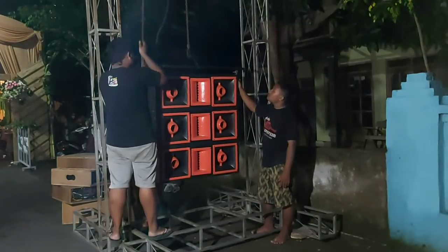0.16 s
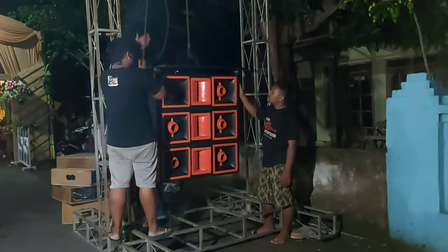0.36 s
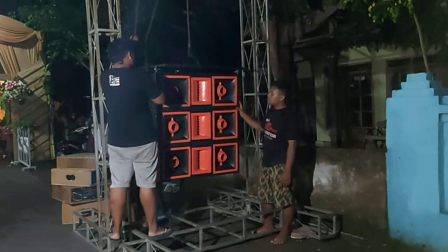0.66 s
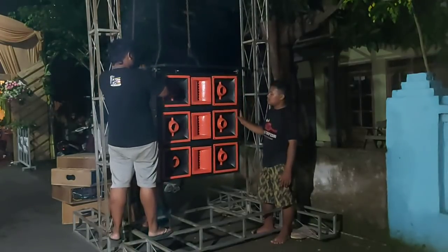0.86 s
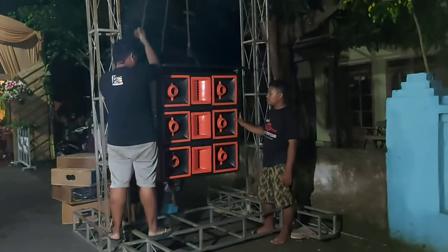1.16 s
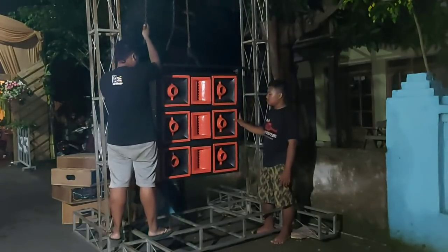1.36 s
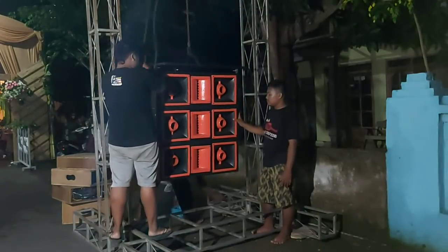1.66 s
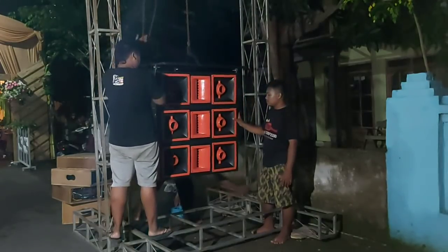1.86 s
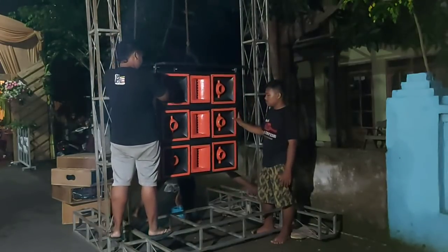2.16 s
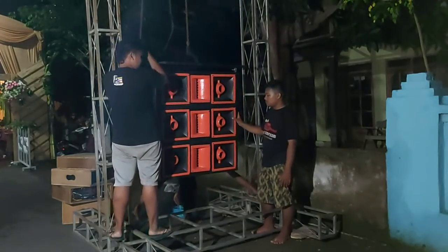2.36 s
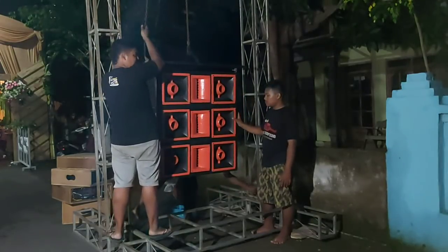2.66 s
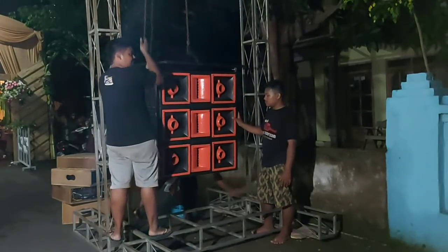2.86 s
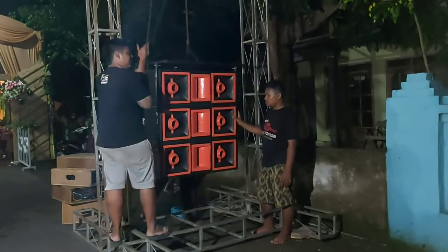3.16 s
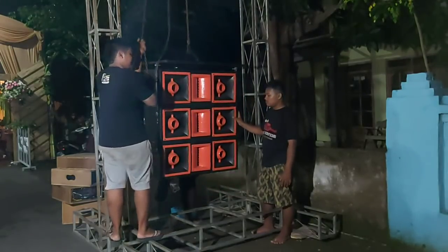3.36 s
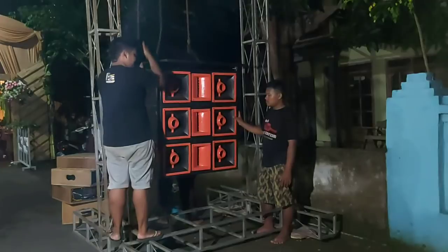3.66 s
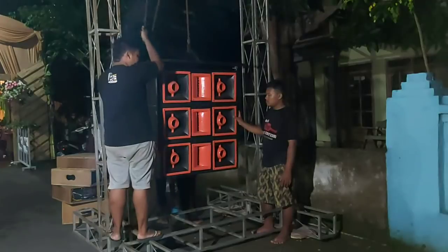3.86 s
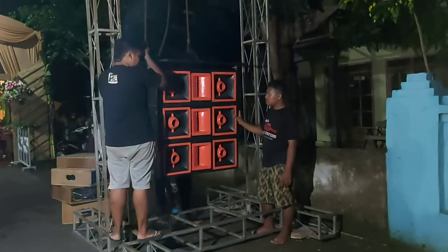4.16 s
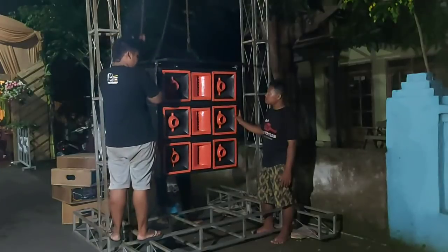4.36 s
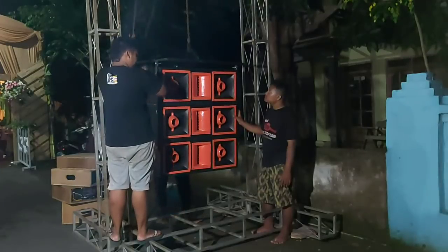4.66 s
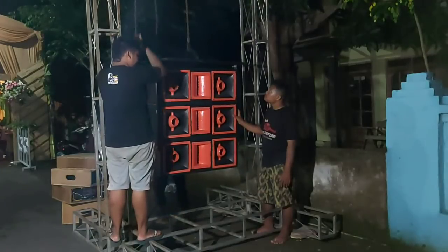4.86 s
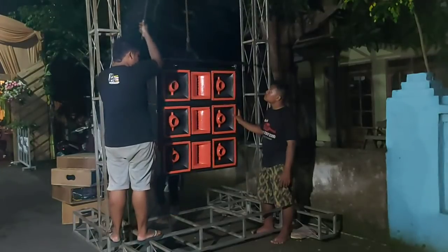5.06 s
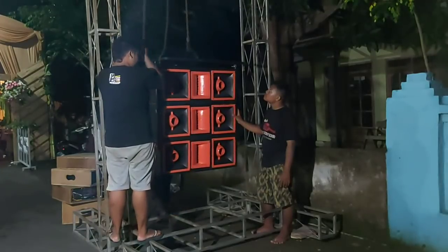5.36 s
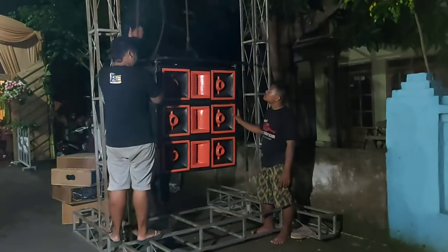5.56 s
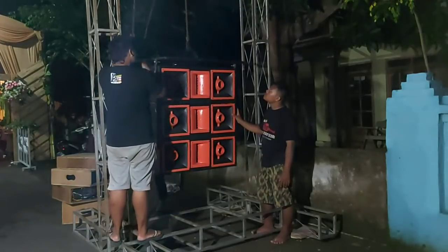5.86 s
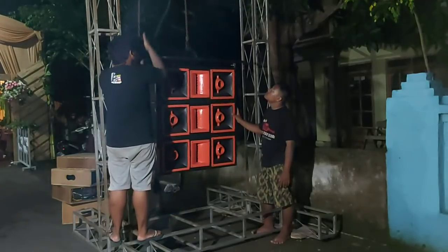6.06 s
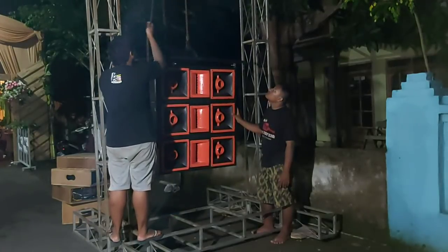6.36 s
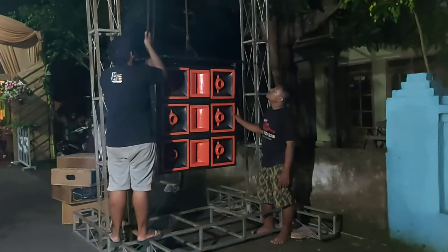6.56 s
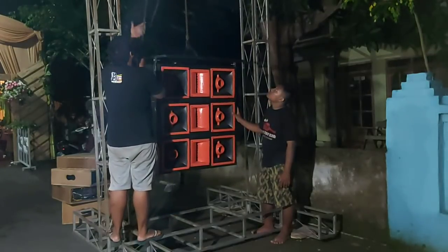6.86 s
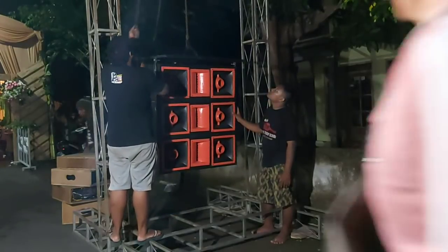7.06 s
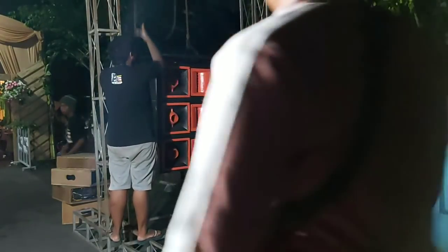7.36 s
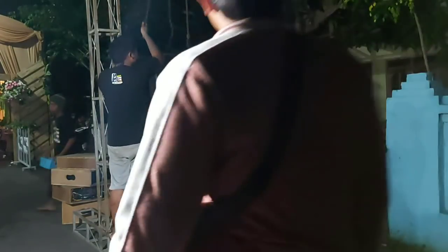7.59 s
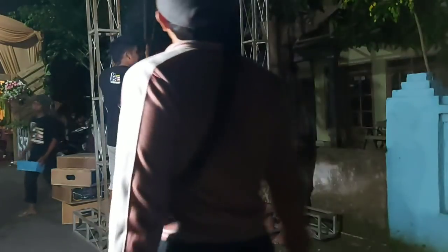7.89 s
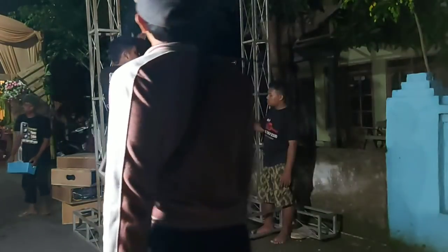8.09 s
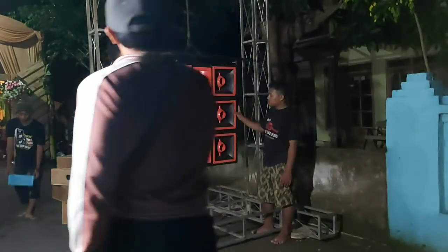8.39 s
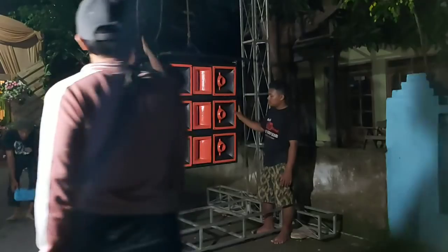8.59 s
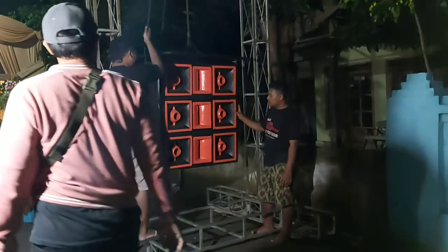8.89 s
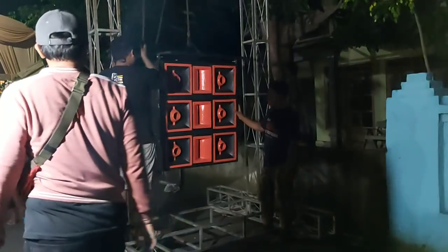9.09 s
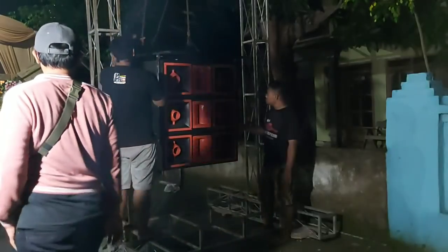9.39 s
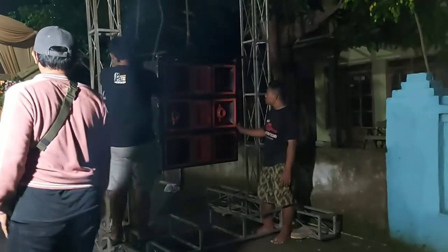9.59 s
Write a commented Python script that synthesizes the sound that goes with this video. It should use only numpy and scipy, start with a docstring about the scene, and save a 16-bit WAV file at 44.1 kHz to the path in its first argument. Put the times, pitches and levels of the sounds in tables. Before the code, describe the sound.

Outdoors at night, a hand-pulled chain hoist works a few metres from a phone. Each pull gives a quick run of hard ratchet clicks, speeding up then slowing, with rattling links and low gear rumble. Short gaps separate pulls. Slack chain knocks hollowly on wooden cabinets; a steel tube clangs around 2.6 seconds and a small piece pings at 3.7. A low hum lies beneath.

```python
"""Low night hum, a faint slap of slack chain on a wooden cabinet, then the pawl of a hand chain hoist
clicking over its ratchet wheel: loudspeaker cabinets go up a steel tower in a yard, a few metres from a phone.
Each pull turns a toothed wheel; its speed drives link rattle and gear rumble, shaped noise ringing resonators.
Chain bursts ring cabinet modes, lash a steel tube twice and one small steel piece pings; walls add a short tail."""
import sys
import numpy as np
from scipy import signal
from scipy.fft import rfft, irfft, next_fast_len
from scipy.io import wavfile
from scipy.ndimage import uniform_filter1d

SR = 44100
rng = np.random.default_rng(int(sys.argv[2]) if len(sys.argv) > 2 else 0)


def boost_factor(decibels):
    """Convert a level in decibels to a linear amplitude factor."""
    exponent = np.asarray(decibels, float) / 20
    return 10 ** exponent


def wav_record(signal):
    """Record a signal, one row per channel, as 16-bit PCM in the file named by sys.argv[1]."""
    frames = np.transpose(np.atleast_2d(signal))
    bounded = np.clip(frames, -1, 1)
    # unit amplitude maps onto the largest positive 16-bit level
    quanta = np.round(bounded * 32767).astype(np.int16)
    wavfile.write(sys.argv[1], SR, quanta)


N = 429093

# night hum spectrum: (frequency [Hz], relative level [dB])
NIGHT_SPECTRUM = [(25, -26), (76.5, -1), (110, 1), (160, -10), (190, -11), (344, -5), (451, -7), (500, -13),
                  (818, -16), (2480, -27), (3500, -33), (5300, -35), (6740, -28), (8000, -35), (16000, -39)]
# stereo width of every noise: (frequency [Hz], side over mid [ratio])
STEREO_WIDTH = [(60, 0.11), (250, 0.23), (500, 0.33), (1000, 0.63), (2000, 0.62), (4000, 0.82), (8000, 0.9),
                (14000, 0.71)]
# slack chain on a cabinet:
# (time [s], relative level [dB], centre of panel struck [Hz], mode fall-off, sign ignored [dB/octave])
CABINET_SLAPS = [(.004, -24, 1100, 5), (.054, -20, 744, -2), (.417, -5, 390, 4), (.434, -5, 401, 6.5),
                 (.6, -16, 1560, 5), (.619, -17, 406, 6), (1.212, -16.5, 1160, 7), (1.371, -26.5, 2130, 8),
                 (1.629, -15, 2430, 3.5), (1.753, -5, 402, 7), (2.136, -9.5, 396, 3),
                 (2.267, -10, 796, 12.5), (2.392, -17, 810, 5), (2.931, -22, 799, 1.5),
                 (3.405, -18.5, 1700, 6), (4.248, -23, 1060, 4), (4.325, -15, 1850, 4),
                 (4.425, -15, 1060, 5.5), (4.99, -17, 789, 3), (5.91, -26, 2400, 2.5),
                 (6.388, -13.5, 1670, 9.5), (6.573, -21.5, 1650, 6), (6.673, -13.5, 2040, 0),
                 (6.701, -12, 2560, 9), (7.223, -14.5, 797, 5.5), (7.312, -18, 799, 9),
                 (7.419, -9, 800, 13), (7.623, -14.5, 1220, 5), (7.698, -14, 476, 8), (7.932, -7, 398, 6.5),
                 (8.38, -22.5, 450, 5), (8.531, -22.5, 1220, 5), (8.633, -11, 361, 5.5),
                 (9.042, -18.5, 1700, 1.5), (9.099, -16, 1260, 6.5), (9.602, -16, 2220, 6),
                 (9.635, -13.5, 775, 1.5)]
# plywood cabinet modes: (frequency [Hz], relative level [dB], t60 [s])
CABINET_MODES = [(406.5, -4.5, 0.19), (545, -6.5, 0.1), (797, -0.5, 0.054), (1056, -5, 0.025),
                 (1225, -3.5, 0.023), (1620, 0.5, 0.013), (1939, -2.5, 0.023), (2128, -6, 0.05),
                 (2594, 0.5, 0.03), (3020, -2, 0.0094)]
# broad dead response of the cabinet: (frequency [Hz], gain [dB])
THUD_SPECTRUM = [(200, -84), (400, -5), (1000, -2), (2200, 14), (3200, -8), (6000, -58)]
# one curve per hand stroke on the ratchet wheel: (time [s], teeth passed [count], relative click level [dB])
HAND_STROKES = [
    [(.053, 0, -1), (.118, 1, -5.5), (.151, 2.5, -7), (.2629, 5.5, -7.5), (.3957, 11, -3.5),
     (.5169, 16, -4.5), (.5985, 20, -8.5), (.662, 21.5, -6.5)],
    [(.794, 0, -8), (.8556, 1, -3.5), (.898, 2, -9), (1.006, 5.5, -5.5), (1.0949, 8, -6), (1.148, 10, -6.5),
     (1.2116, 12.5, -5), (1.2548, 13, -6)],
    [(1.5312, 0, -8.5), (1.5822, 1, -6.5), (1.6244, 2, -5.5), (1.6781, 4, -3.5), (1.8558, 14, -5.5),
     (1.9904, 20, -6.5), (2.0204, 21, -5.5), (2.059, 22, -10.5)],
    [(2.1318, 0, -3.5), (2.2179, 1, -5.5), (2.2628, 2, -5.5), (2.3642, 5, -7), (2.496, 9.5, -7.5)],
    [(2.867, 0, -7.5), (2.9113, 1, -8.5), (2.9692, 3, -9), (3.0471, 6, -6), (3.2135, 16, -7),
     (3.281, 19, -6.5), (3.3102, 20, -12)],
    [(3.5954, 0, -8), (3.649, 1, -3), (3.714, 3, -6.5), (3.8276, 8, -8), (3.9071, 11, -7.5),
     (3.9433, 12, -9)],
    [(4.1256, 0, -10), (4.193, 1, -6.5), (4.2296, 2, -8), (4.286, 4, -8), (4.414, 11.5, -10),
     (4.5067, 16, -8.5), (4.5669, 18, -9)],
    [(4.7854, 0, -8), (4.831, 1, -7.5), (4.8663, 2, -9), (4.9583, 6, -7.5), (5.0755, 12, -7.5),
     (5.128, 14.5, -8.5), (5.1797, 15.5, -12.5)],
    [(5.3322, 0, -7), (5.38, 1, -6.5), (5.4167, 2, -5.5), (5.472, 4, -4.5), (5.5895, 10, -7),
     (5.675, 14, -4.5), (5.717, 16, -4), (5.745, 17, -9.5)],
    [(5.874, 0, -11.5), (5.9078, 1, -11), (5.9674, 2, -4.5), (6.0014, 3, -4.5), (6.102, 7, -5.5),
     (6.2038, 12, -5.5), (6.2946, 16, -6), (6.3573, 17.5, -7)],
    [(6.5206, 0, -8.5), (6.5996, 1, -7), (6.651, 2, -3.5), (6.6947, 3, 2.5), (6.7261, 4, -7.5),
     (6.8115, 7.5, -7.5), (6.8894, 10, -5), (6.974, 13, -5), (7.056, 15.5, -7)],
    [(7.194, 0, -10), (7.2628, 1, -6.5), (7.309, 2, -7), (7.3675, 4, -6), (7.4866, 9.5, -7),
     (7.6176, 14, -5.5), (7.6809, 16, -7.5), (7.7267, 17, -9)],
    [(7.781, 0, -5), (7.8269, 1, -5), (7.8799, 2, -4.5), (7.9474, 4, -5.5), (8.037, 8, -7),
     (8.1452, 13.5, -8.5), (8.2504, 17, -5.5), (8.3162, 19, -8), (8.3849, 20.5, -11), (8.416, 21, -9.5)],
    [(8.4796, 0, -4.5), (8.5253, 1, -6), (8.5621, 2, -2.5), (8.6408, 5.5, -4.5), (8.7864, 11, -6),
     (8.845, 13, -9), (8.8843, 14, -7)],
    [(9.0038, 0, -10), (9.0386, 1, -8), (9.068, 2, -8), (9.121, 3, -3), (9.1523, 4, -3.5),
     (9.2257, 7, -6.5), (9.3173, 11, -8), (9.4049, 15, -5), (9.5157, 19, -7), (9.5547, 20, -6),
     (9.6314, 21, -12)],
]
# pawl noise spectrum: (frequency [Hz], relative level [dB])
PAWL_SPECTRUM = [(350, -1), (600, -8.5), (834, -4), (944, -10), (1040, -7.5), (1830, -5.5), (2540, -3.5),
                 (5260, -3), (12200, -2), (16000, -10.5)]
# link noise spectrum: (frequency [Hz], relative level [dB])
RATTLE_SPECTRUM = [(240, -65), (400, -1), (439, 4), (481, -4), (814, -3.5), (935, -14), (2400, -4.5),
                   (3310, -5.5), (6740, -6), (14800, -12.5), (16000, -20.5)]
# gear noise spectrum: (frequency [Hz], relative level [dB])
RUMBLE_SPECTRUM = [(35, -37), (60, -2.5), (172, -12.5), (293, 8.5), (380, -14), (441, -5), (483, -12.5),
                   (900, -30.5), (1170, -49), (1980, -120)]
# growth with wheel speed, one row:
# (relative level at 40 teeth/s [dB], rise per doubling of speed [dB], lag [s], relative level at rest [dB])
RATTLE_SPEED_LAW = (-32, 7, 0.03, -57)
RUMBLE_SPEED_LAW = (-34, 6, 0.06, -52.5)
# hoist housing and gear case modes: (frequency [Hz], relative level [dB], t60 [s])
HOUSING_MODES = [(1807, -18, 0.028), (2237, -46, 0.21), (2400, -25, 0.13), (2476, -20.5, 0.068),
                 (2600, -21, 0.076), (2936, -18.5, 0.0085), (4370, -19.5, 0.073), (4570, -14.5, 0.018),
                 (5960, -17.5, 0.055), (6690, -18.5, 0.023), (6930, -15.5, 0.018), (7580, -15.5, 0.12),
                 (8500, -18.5, 0.028), (8800, -18.5, 0.009), (9060, -23, 0.029), (10200, -28, 0.089),
                 (11800, -20, 0.03)]
GEARCASE_MODES = [(100.7, -4, 0.23), (223, -2.5, 0.24), (295, -2, 0.13), (348, -3, 0.084), (443, 1, 0.23),
                  (570, -9, 0.11)]
# chain on a tower tube: (time [s], relative crash level [dB], relative ring level [dB])
TUBE_LASHES = [(1.654, -21, -19), (1.701, -26, -16.5), (2.567, -27, -30), (2.579, -8.5, -9),
               (2.599, -20, -17)]
# crash noise spectrum: (frequency [Hz], relative level [dB])
LASH_SPECTRUM = [(400, -27), (800, -9.5), (2150, -0.5), (5000, -3.5), (7000, -3.5), (13500, -15),
                 (16000, -30)]
# tower tube modes: (frequency [Hz], relative level [dB], t60 [s])
TUBE_MODES = [(1520, -9, .15), (2080, -6, .2), (2719, -7, .3), (3480, -8, .15), (4194, -8, .2),
              (6170, -6, .2), (6230, -5, .25), (6340, -4, .1), (8600, -9, .18), (11370, -9, .18),
              (12330, -11, .15), (13500, -12, .1)]
# blows on a small solid steel piece: (time [s], relative level [dB])
PIECE_BLOWS = [(3.657, -34), (3.664, -4)]
# steel piece modes: (frequency [Hz], relative level [dB], t60 [s])
PIECE_MODES = [(5122, -17, .3), (7850, -15, .25), (7892, -8, .6), (11163, -5.5, .5), (11168.5, -6.5, .5),
               (11560, -20, .1), (14510, -16, .22)]
# microphone response: (frequency [Hz], gain [dB])
MIC_RESPONSE = [(20, -39), (45, -9.5), (70, -4), (14500, -1), (15500, 1), (16500, -44)]
# phase by which the right port lags: (frequency [Hz], lag [rad])
RIGHT_PORT_LAG = [(100, .02), (800, 0.17), (2400, 0.21), (4500, 0.53), (7000, 0.65), (12000, 0.086)]

NIGHT_DB = -38.5  # rms, before its slow wander
LEFT_OVER_RIGHT_DB = -1
SLAP_S = 0.022  # how long a run of links takes to land
YARD_T60_S, YARD_TREBLE_T60_S, YARD_DB = 0.3, 0.25, -5
TOOTH_SCATTER_DB = 2.0  # teeth differ in how hard the pawl lands
HURRIED_DB = -4  # per doubling above 30 teeth/s: the pawl has less time to fall
RUN_ON_S = 0.055  # longest time chain and gears take to settle after a tooth


def level(x, db):
    """Scale to an rms level."""
    return x * boost_factor(db) / np.sqrt(np.mean(x ** 2))


def along(table, hz):
    """Read a (Hz, value) table on a log-frequency axis."""
    table_hz, value = np.transpose(table)
    return np.interp(np.log(hz + 1), np.log(table_hz), value)


def colour(x, table):
    """Filter by a (Hz, dB) spectrum."""
    size = next_fast_len(N)
    gain = boost_factor(along(table, np.fft.rfftfreq(size, 1 / SR)))
    return irfft(rfft(x, size) * gain, size)[..., :N]


def lowpass(x, order, hz):
    """Butterworth low-pass."""
    return signal.sosfilt(signal.butter(order, hz, fs=SR, output="sos"), x)


def noise(length=N):
    """Two-port noise from mid and side: alike in the bass, less alike in the treble."""
    size = next_fast_len(length)
    mid, side = rfft(rng.standard_normal((2, size)))
    side = side * along(STEREO_WIDTH, np.fft.rfftfreq(size, 1 / SR))
    return level(irfft(np.array([mid + side, mid - side]), size)[:, :length], 0)


def fading(s, gain, t60_s, rise_s=0.00024):
    """Envelope that rises at each blow and decays exponentially."""
    blows = np.bincount(np.clip(np.round(s * SR).astype(int), 0, N - 1), gain, N)
    decay = np.exp(-np.log(1000) / (t60_s * SR))
    soft = np.exp(-1 / (rise_s * SR))
    return signal.lfilter([1 - soft], [1, -soft], signal.lfilter([1], [1, -decay], blows))


def walk(rate_hz):
    """Random levels held 1 / rate_hz and slewed twice."""
    hold = int(SR / rate_hz)
    steps = np.repeat(rng.standard_normal(N // hold + 1), hold)
    return 1.2 * uniform_filter1d(uniform_filter1d(steps, hold), hold)[:N]


def ring(x, modes, patchy_db=0):
    """Sum of two-pole resonators, unit energy per click; patchy_db lets each mode's share wander."""
    out = 0
    for hz, db, t60_s in modes:
        r = np.exp(-np.log(1000) / (t60_s * SR))
        w = 2 * np.pi * hz / SR
        drive = x * boost_factor(db + patchy_db * walk(35)) if patchy_db else x * boost_factor(db)
        gain = np.sin(w) * np.sqrt(1 - r * r)
        out = out + signal.lfilter([gain], [1, -2 * r * np.cos(w), r * r], drive)
    return out


def night_hum():
    """Low shaped noise whose level wanders slowly."""
    return level(colour(noise(), NIGHT_SPECTRUM), NIGHT_DB) * boost_factor(0.51 * walk(2.47))


def slaps():
    """A run of links lands on plywood over some tens of ms; modes near the panel's centre ring most."""
    out, push = np.zeros((2, N)), np.zeros((2, N))
    t = np.arange(int(0.3 * SR)) / SR
    u = t / SLAP_S
    landing = np.minimum(u * 5, 1) * np.exp(-u ** 2)
    for s, db, centre_hz, fall_db in CABINET_SLAPS:
        fall_db = abs(fall_db)
        links = noise(len(t)) * landing * boost_factor(db - 4.5)
        detune = 1 + 0.022 * rng.standard_normal(len(CABINET_MODES))
        modes = []
        for (hz, mode_db, t60_s), ratio in zip(CABINET_MODES, detune):
            octaves = abs(np.log2(hz / centre_hz))
            modes.append((hz * ratio, mode_db - fall_db * octaves, t60_s))
        i = max(int((s - 0.002) * SR), 0)
        out[:, i:i + len(t)] += ring(links, modes)[:, :N - i]
        push[:, i:i + len(t)] += links[:, :N - i] * boost_factor(-fall_db)
    # besides its modes the box answers with a broad dead thud
    return out + boost_factor(1) * colour(push, THUD_SPECTRUM)


def yard(x):
    """House walls and trees: a diffuse mono-fed tail whose treble dies first."""
    t = np.arange(int(0.7 * SR)) / SR
    tail = noise(len(t)) * np.minimum(t / 0.043, 1)
    low = lowpass(tail, 2, 4000)
    tail = low * boost_factor(-60 * t / YARD_T60_S) + (tail - low) * boost_factor(-60 * t / YARD_TREBLE_T60_S)
    response = level(tail, YARD_DB) / np.sqrt(len(t))
    return signal.fftconvolve(x.mean(axis=0, keepdims=True), response, axes=1)[:, :N]


def teeth():
    """Time and strength of every tooth: the wheel turns smoothly (cubic) between points of a stroke."""
    rows = []
    for stroke in HAND_STROKES:
        s, turned, db = np.transpose(stroke)
        turned = np.round(turned)
        pace = np.gradient(s, turned)  # s per tooth
        tooth = np.arange(turned[-1] + 1)
        j = np.minimum(np.searchsorted(turned, tooth, "right") - 1, len(s) - 2)
        span, span_s = turned[j + 1] - turned[j], s[j + 1] - s[j]
        u = (tooth - turned[j]) / span
        bend_in = (1 - u) * (pace[j] * span - span_s)
        bend_out = u * (pace[j + 1] * span - span_s)
        tooth_s = s[j] + u * span_s + u * (1 - u) * (bend_in - bend_out)
        between = (u % 1 > 0) * 1.0  # 0 at the listed points
        rows.append([tooth_s, np.interp(tooth, turned, db), between])
    s, db, between = np.hstack(rows)
    hurry = np.maximum(np.log2(1 / np.gradient(s) / 30), 0)
    db = db + HURRIED_DB * between * hurry
    return s, db + TOOTH_SCATTER_DB * between * rng.standard_normal(len(s))


def with_speed(s, law):
    """Level in time from the wheel speed, read off the gaps between teeth."""
    db, doubling_db, lag_s, rest_db = law
    gap_s = np.diff(s)
    speed = 1 / np.maximum(gap_s, 1 / 100)  # teeth/s
    reach = np.minimum(gap_s / 2, RUN_ON_S)
    moving_db = np.maximum(db + doubling_db * np.log2(speed / 40), rest_db)
    # each gap holds its level from reach after one tooth to reach before the next
    knots_s = np.ravel([s[:-1] + reach, s[1:] - reach], "F")
    return np.interp(np.arange(N) / SR - lag_s, knots_s, np.repeat(moving_db, 2), rest_db, rest_db)


def pawl(s, db):
    """Pawl drops on each tooth: noise with a short tick and a longer chatter."""
    tick = fading(s, boost_factor(db), 0.011, rise_s=0.00019) * boost_factor(-17)
    chatter = fading(s, boost_factor(db), 0.14, rise_s=0.0015) * boost_factor(-15.5)
    return level(colour(noise(), PAWL_SPECTRUM), 0) * (tick + chatter)


def rattle(db):
    """Links knocking over the pocket wheel: dense small grains, duller as the chain slows."""
    chance = rng.random((4000, 2))
    grain_gain = boost_factor(-2.6 * np.log(1 - chance[:, 1]))
    grains = fading(chance[:, 0] * N / SR, grain_gain, 0.043)
    links = level(colour(noise(), RATTLE_SPECTRUM) * (grains + 2.0), 0)
    dull = lowpass(links, 1, 6000)
    return boost_factor(db + 4) * (dull + (links - dull) * boost_factor(0.4 * (db + 28)))


def housing(works):
    """Pawl and links ring the housing; each of its modes sounds as a pair tuned a little apart."""
    pairs = [(hz * (1 + side * 0.0096), db, t60_s) for hz, db, t60_s in HOUSING_MODES for side in (-1, 1)]
    return boost_factor(-8) * ring(works, pairs, patchy_db=6.0)


def rumble(db):
    """Gear mesh shakes the case and tower, more as the chain moves faster."""
    db = db + 1.8 * walk(9)  # the load comes on in lumps
    shake = boost_factor(-2.0) * level(colour(noise(), RUMBLE_SPECTRUM), 0) * boost_factor(db + 0.95 * walk(26))
    return shake + boost_factor(-3.5) * ring(noise() * boost_factor(db), GEARCASE_MODES, patchy_db=1)


def lash():
    """The tube shimmers in many modes over a dense crash whose treble dies first."""
    s, crash_db, ring_db = np.transpose(TUBE_LASHES)
    blow = noise() * (fading(s, boost_factor(ring_db), 0.034) + boost_factor(-14.0) * fading(s, boost_factor(ring_db), 0.25))
    hiss = level(colour(noise(), LASH_SPECTRUM), -7)
    low = lowpass(hiss, 1, 5000)
    crack = fading(s, boost_factor(crash_db), 0.047) * boost_factor(3)
    bass_crash = low * (fading(s, boost_factor(crash_db), 0.74) + crack)
    treble_crash = (hiss - low) * (fading(s, boost_factor(crash_db), 0.3) + crack)
    return ring(blow, TUBE_MODES) + bass_crash + treble_crash


def ping():
    """A small solid piece is struck: a few clean lines, close pairs beating slowly, louder on the right."""
    s, db = np.transpose(PIECE_BLOWS)
    blows = np.bincount(np.round(s * SR).astype(int), boost_factor(db), N)
    swell = 1 - fading(s, np.ones(len(s)), 0.01)  # the lines take a moment to build
    return boost_factor(28) * ring(blows, PIECE_MODES) * swell * boost_factor([[-1.5], [1.5]])


def scene():
    """Hoist, chain and steel with their tail, over the night hum."""
    night = night_hum()
    s, db = teeth()
    works = pawl(s, db) + rattle(with_speed(s, RATTLE_SPEED_LAW))
    works = works + housing(works)
    hoist = slaps() + works + rumble(with_speed(s, RUMBLE_SPEED_LAW)) + lash()
    balance = boost_factor([[LEFT_OVER_RIGHT_DB / 2], [-LEFT_OVER_RIGHT_DB / 2]])
    return (hoist + yard(hoist) + ping() + night) * balance


def top_cut(x):
    """Nothing passes above the cut-off."""
    return signal.sosfilt(signal.butter(12, 16640, fs=SR, output="sos"), x)


def record(dry):
    """The phone trims both ends of the range; its right port hears slightly later."""
    left, right = colour(dry, MIC_RESPONSE)
    lag_rad = along(RIGHT_PORT_LAG, np.fft.rfftfreq(N, 1 / SR))
    right = irfft(rfft(right) * np.exp(-1j * lag_rad), N)
    return top_cut(np.array([left, right]))


dry = scene()
out = record(dry)
wav_record(out)
```